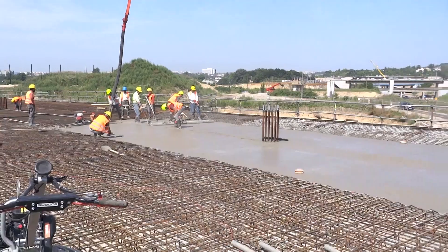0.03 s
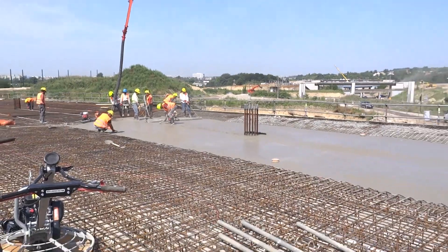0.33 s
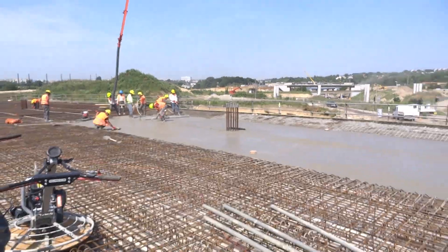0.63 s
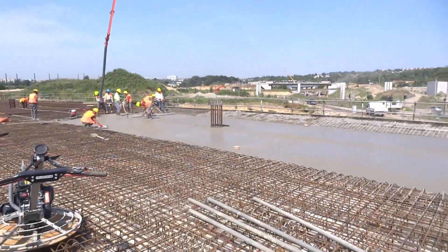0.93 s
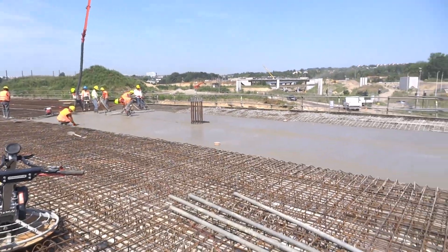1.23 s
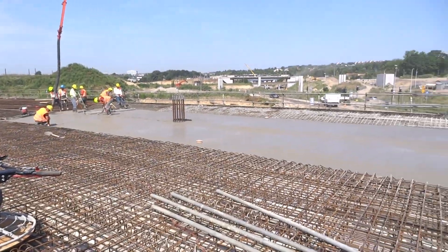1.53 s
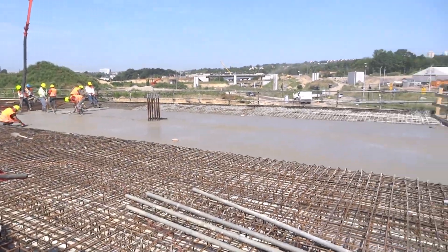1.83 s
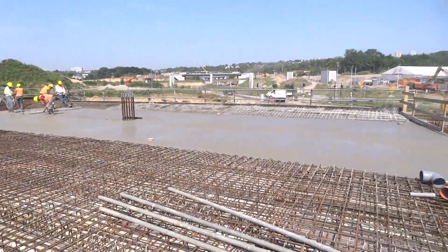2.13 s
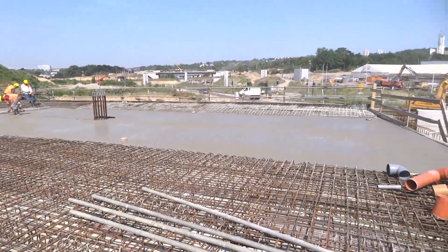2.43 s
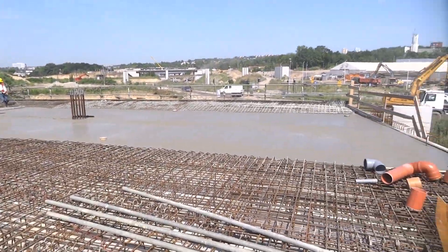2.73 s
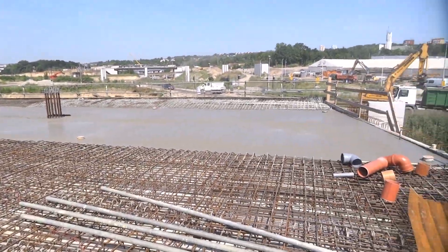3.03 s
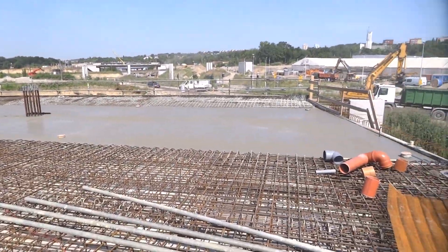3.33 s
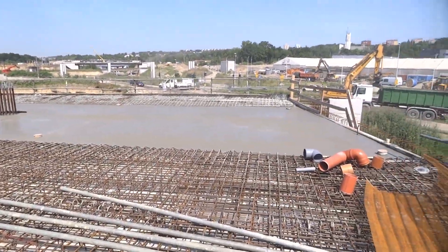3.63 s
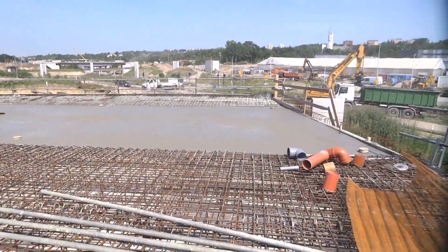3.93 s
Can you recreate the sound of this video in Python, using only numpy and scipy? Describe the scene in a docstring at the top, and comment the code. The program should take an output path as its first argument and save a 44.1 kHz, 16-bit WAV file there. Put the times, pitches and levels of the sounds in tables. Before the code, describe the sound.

A concreting machine's engine drones steadily outdoors with a fast metallic clatter.

```python
"""An open bridge deck, near a concreting engine at governed speed, four firings to a cycle.
The exhaust drones, the casing rings and howls, and the mechanism clatters in time with the firings,
echoing off nearby steel. Machines hum further off. The stereo microphone fades in and turns away,
which changes the colour; two brief scuffs pass close by, and gain control holds the level."""
import sys
import numpy as np
from scipy import signal
from scipy.fft import rfft, irfft
from scipy.io import wavfile
from scipy.ndimage import uniform_filter1d, map_coordinates

SR = 44100
rng = np.random.default_rng(int(sys.argv[2]) if len(sys.argv) > 2 else 0)


def transcribe(signal):
    """Save signal, clipped to [-1, 1], as a 16-bit WAV file at the path in sys.argv[1]."""
    frames = np.atleast_2d(signal).T
    limited = np.clip(frames, -1, 1)
    pcm = np.round(limited * 32767).astype(np.int16)
    wavfile.write(sys.argv[1], SR, pcm)


N = 176400
TIME, FREQS = np.arange(N) / SR, np.arange(N // 2 + 1) * SR / N

# Distant machines. Each row: pitch in Hz, level in dB.
FAR_HUM = [(51.5, -45)]
# Rubs, three to a scuff. Each row: start and length in seconds, level in dB, centre in Hz,
# side minus mid in dB.
SCUFFS = [(0.234, 0.03, -12.5, 6740, -17), (0.263, 0.08, -10.5, 5100, -14), (0.34, 0.065, -22, 4500, -24),
          (3.523, 0.023, -14.5, 6800, -6), (3.55, 0.074, -14, 4000, -7), (3.619, 0.071, -19.5, 3980, -14)]
# Engine speed. Each row: time in seconds, cycles per second.
SPEED = [(0, 31.64), (.3, 31.63), (.5, 31.77), (.72, 31.72), (1.1, 31.35), (1.35, 31.6), (1.55, 31.73),
         (1.75, 31.94), (2.2, 31.53), (2.45, 31.47), (2.6, 31.61), (3.08, 31.79), (3.37, 31.47),
         (3.62, 31.7), (4, 31.57)]
# Exhaust lines. Each row: multiple of the cycle rate, level in dB.
EXHAUST_LINES = [(4, -30.5), (5, -33), (6, -38.5), (7, -74), (8, -29.5), (9, -31.5), (10, -32.5),
                 (11, -36.5), (12, -31), (13, -43.5), (14, -63), (15, -41.5), (16, -56), (17, -43.5),
                 (18, -40.5), (19, -38), (21, -35), (22, -40), (23, -35), (24, -34.5), (25, -33), (26, -35),
                 (27, -32), (29, -37), (30, -30.5)]
# Level of exhaust and far hum. Each row: time in seconds, gain in dB.
BASS_GAIN = [(.1, -.5), (.23, -1), (.3, -3.5), (.5, 0), (1.6, -2), (2.2, -1), (2.67, 2.7), (3.1, -1),
             (3.48, -1), (3.57, -8.5), (3.7, 1.5), (3.8, -4.5), (4, 0)]
# Three casing tones. Each row: time in seconds, level in dB.
LOW_TONE_DB = [(.1, -25.5), (0.699, -22.5), (1.2, -22), (1.8, -21.5), (2.1, -26), (2.6, -27), (3, -28),
               (3.5, -35), (4, -50)]
MID_TONE_DB = [(.1, -27), (.3, -28), (.5, -20.5), (1, -20), (1.55, -23.5), (1.75, -28), (2.3, -25),
               (2.62, -23), (2.8, -13), (3.15, -28.5), (3.5, -24.5), (4, -27)]
HIGH_TONE_DB = [(0.098, -32), (1.5, -27.5), (2.2, -27), (2.6, -17.5), (3.1, -20), (3.3, -29), (3.48, -38),
                (3.57, -35), (3.699, -23.5), (4, -22)]
# Beamed whines. Each row: multiple of the cycle rate (rounded in use), level in dB,
# time on microphone and half length of the pass in seconds.
WHINES = [(41, -29.5, 0.22, .15), (53, -27, 1.24, 0.54), (54, -23, 2.23, 0.56), (56, -23.5, 2.8, 1.13),
          (57, -26, 3.4, 0.2), (60, -25, 3.8, 0.69), (61, -28.5, 0.17, 0.17), (65.44, -28, .6, 1.4),
          (67.06, -29, .6, 1.6), (69.8, -23, 5.4, 0.72), (77.5, -27, 1.3, 0.62), (85, -24, 0.091, 0.13),
          (88.8, -28, 0.42, 0.67), (90.6, -26, 0.15, 0.31), (92.9, -31.5, 0.83, 1.4)]
# Beamed casing resonances. Each row: centre and width in Hz, level in dB,
# time on microphone and half length of the pass in seconds.
CASING_MODES = [(1310, 14, -38, 2.16, 0.084), (1701, 44, -23.5, 1.67, 0.71), (1800, 28, -37, 2.1, 0.47),
                (1884, 23, -22, 4.1, 0.45), (1880, 45, -26, 2.1, 0.26), (2110, 23, -26.5, 1.3, 1),
                (2090, 150, -28, 2.05, 0.19), (2257, 27, -27.5, 2.7, 1), (2426, 24, -24, 1.5, 1),
                (2844, 73, -20.5, .17, .2), (2932, 20, -28, 1.6, 0.41), (3507, 28, -26.5, 0.57, .42),
                (3636, 14, -28, 0.95, 0.37), (4020, 26, -31.5, 1.3, 0.85), (4130, 22, -31, 2.2, 0.43),
                (4520, 22, -30.5, 1.1, 1), (5320, 90, -42, 0.78, 0.99), (6050, 15, -29, 1.22, 0.66),
                (7840, 89, -41, 1.7, 0.55), (9580, 93, -35, 0.43, 0.96), (11250, 150, -33, 0.81, 0.59),
                (11800, 82, -46, .8, .5), (12500, 150, -43, 3, 0.33)]
# Casing howl, louder off axis. Each row: time in seconds, centre in Hz, level in dB.
HOWL = [(1.6, 965, -36), (2.3, 985, -27), (2.7, 1017, -30.5), (3.08, 1037, -19.5), (3.4, 994, -19),
        (3.6, 1014, -23.5), (3.9, 1033, -22), (4, 1015, -18)]
# Knocks of one cycle. Each row: lag as a share of a firing period, level in dB.
CYLINDERS = [(0.0077, -3.5), (0.037, -5.5), (.02, -5.5), (0.058, -3)]
# Clatter colour. Each row: frequency in Hz, gain in dB facing the engine, gain in dB turned away.
CLATTER_COLOUR = [(30, -25, -20), (91, -11.5, -14), (146, -10, -6), (313, -3, 1), (500, -7, -2.5),
                  (700, 0.5, -0.5), (900, 0, 1.5), (1060, 0, 2), (1113, -10, 2), (1240, -5.5, -3),
                  (1340, -0.5, -4), (1550, -4, -2.5), (1590, -1, 6), (1670, 1.5, 4), (1830, -5, 5.5),
                  (1970, -0.5, 0.5), (2190, -3, -3), (2205, 2.5, 5), (2654, 1.5, 2.5), (2760, -2, -5),
                  (2880, 4, -2), (2960, -5, -8), (3170, 3, -2.5), (3350, -7, -5), (3600, -5.5, -5.5),
                  (3930, -4.5, -8), (4390, -6, -12), (4560, -11.5, -15.5), (4800, -13, -9),
                  (5400, -10, -8.5), (5800, -8.5, -10.5), (6230, -12.5, -17.5), (6930, -14.5, -16),
                  (6900, -14.5, -13.5), (7640, -14.5, -19), (8500, -16.5, -20), (8850, -12, -16.5),
                  (10100, -13.5, -18.5), (10700, -16.5, -23), (11300, -18.5, -21.5), (12700, -18, -21.5),
                  (13500, -30, -32), (15100, -51, -46)]
# Treble of the clatter. Each row: time in seconds, gain in dB.
TREBLE_GAIN = [(.1, 1), (1.2, -2.5), (1.7, -4.5), (2.2, -3), (2.65, -2), (2.9, 1), (3.4, -5), (3.7, -2),
               (4, -1)]
# Level of clatter, resonances, howl and whines. Each row: time in seconds, gain in dB.
CLATTER_GAIN = [(.1, -0.5), (.23, 1), (.29, 0), (.38, 1.5), (.5, 1.5), (1, 3), (1.6, 0), (2.1, 1),
                (2.45, 0.5), (2.65, 3.5), (3.2, -0.5), (3.5, -1.5), (3.55, -5.5), (3.63, -3.5), (3.73, -3),
                (3.8, -1.5), (4, -1)]
# Microphone turning away. Each row: time in seconds, share of the turn from 0 to 1.
MIC_TURN = [(0, 0.2), (1.2, 0.03), (1.9, 0.35), (2.3, 0.62), (2.6, 0.58), (3.2, 0.82), (4, 1)]
# Stereo width. Each row: frequency in Hz, side minus mid in dB.
STEREO_WIDTH = [(60, -57), (300, -46), (520, -23.5), (800, -27), (1150, -16), (1450, -22), (1900, -18.5),
                (2400, -25), (3700, -19), (5300, -17), (8000, -78), (13000, -76)]
# Lean to the left. Each row: time in seconds, left minus right in dB before weighting.
PAN_DB = [(0, -0.1), (1, 0), (2.2, 2), (4, 3.5)]
# Weighting of that lean. Each row: frequency in Hz, gain in dB.
PAN_WEIGHT = [(150, -23), (350, -4), (500, 3), (750, -3), (1100, 0.5), (1400, 0), (1800, -0.5), (2550, -3),
              (3500, 2.5), (4500, 1.5), (6000, -2), (8000, -17)]


def undb(db):
    return 10 ** (np.asarray(db) / 20)


def curve(rows):
    """A control joined by straight lines."""
    return np.interp(TIME, *np.array(rows).T)


def unit(x):
    return x / np.sqrt(np.mean(x ** 2))


def walk(rate_hz):
    """Smooth chance with spread 1."""
    return unit(irfft(rfft(rng.standard_normal(N)) * np.exp(-(FREQS / rate_hz) ** 2), N))


def colour(x, hz, db):
    """Filter by a spectrum of (Hz, dB) points."""
    return irfft(rfft(x) * undb(np.interp(np.log(FREQS + 1e-3), np.log(hz), db)), N)


def even(x, width_hz=140):
    """Even out the broad colour of a sound and leave its lines."""
    spectrum = rfft(x)
    power = uniform_filter1d(np.abs(spectrum) ** 2, int(width_hz * N / SR))
    return unit(irfft(spectrum / np.sqrt(power), N))


def ring(x, hz, width_hz, order=1):
    """A resonance with gain 1 at its centre."""
    f = FREQS + 1e-3
    return irfft(rfft(x) / (1 + 1j * (f * f - hz * hz) / (f * width_hz)) ** order, N)


def beam(facing_s, half_s, depth_db=14):
    """Gain in dB of a beamed sound as the microphone sweeps through it."""
    return depth_db * (np.exp(-((TIME - facing_s) / half_s) ** 2 / 2) - 1)


def far_hum(waver=.4):
    """The low wavering tone of machines further off."""
    return sum(np.sqrt(2) * undb(db + 2 * walk(3)) * np.sin(2 * np.pi * hz * TIME + waver * walk(3.7))
               for hz, db in FAR_HUM)


def scuffs(grain_db=2.2, top_hz=9260):
    """Short grainy rubs close to the microphone, a little different at each port."""
    grit = rng.standard_normal((2, N)) * undb(grain_db * walk(350))
    out = 0
    for start, length, db, hz, side_db in SCUFFS:
        progress = np.clip((TIME - start) / length, 0, 1)
        shape = np.sqrt(np.abs(np.sin(np.pi * progress)))
        mid, side = unit(ring(grit, hz, 2 * hz, order=2))
        out += undb(db) * shape * (mid + undb(side_db) * side * np.array([[1], [-1]]))
    return signal.sosfilt(signal.butter(5, top_hz, fs=SR, output="sos"), out)


def steel_echoes(x, count=8, lag_s=.0035, drift_s_per_s=.00009, echo_db=-13.5, above_hz=4500):
    """Nearby steel reflects the treble; the short lags drift as the microphone moves."""
    echoes = 0
    for lag, drift, sign in rng.uniform(-1, 1, (count, 3)):
        sent_s = TIME - lag_s * (.55 + .45 * lag) - drift_s_per_s * drift * TIME
        echoes += np.sign(sign) * map_coordinates(x, [sent_s * SR], order=3, mode="mirror")
    return signal.sosfilt(signal.butter(3, above_hz, "high", fs=SR, output="sos"), undb(echo_db) * echoes)


def exhaust(cycle, rough=.22, wander_db=2.5):
    """Multiples of the firing rate pulse together; uneven cylinders fill the lines between."""
    out = 0
    for multiple, db in EXHAUST_LINES:
        phase = 2 * np.pi * rng.random() * (multiple % len(CYLINDERS) > 0)
        line = np.sin(2 * np.pi * multiple * cycle + phase + rough * walk(11.5))
        out += np.sqrt(2) * undb(db + wander_db * walk(7.1)) * line
    return out


def casing_whines(cycle, rough=.42):
    """Narrow casing modes lock to multiples of the cycle rate, each beamed its own way."""
    out = 0
    for multiple, db, facing_s, half_s in WHINES:
        sway = 1 + rough * (walk(2.9) + 1j * walk(11))
        line = (sway * np.exp(2j * np.pi * (round(multiple) * cycle + rng.random()))).real
        out += np.sqrt(2) * undb(db + beam(facing_s, half_s) - .5) * line
    return out


def casing_tone(cycle, levels, multiple, rough=.16, lag_cycles=.0443):
    """A casing resonance driven on one multiple of the cycle rate, a little behind the firing."""
    sway = 1 + rough * (walk(20) + 1j * walk(29))
    line = (sway * np.exp(2j * np.pi * multiple * (cycle - lag_cycles))).real
    return np.sqrt(2) * undb(curve(levels)) * line


def casing_howl(drive, width_hz=35):
    """The knocks excite a casing resonance whose centre wavers."""
    rows = np.array(HOWL)
    spin = np.exp(2j * np.pi * np.cumsum(curve(rows[:, :2])) / SR)
    pole = np.exp(-np.pi * width_hz / SR)
    howl = (spin * signal.lfilter([1 - pole], [1, -pole], drive / spin)).real
    return undb(curve(rows[:, [0, 2]])) * unit(howl)


def casing_ring(drive, wander_db=.9):
    """The knocks ring the casing; each resonance swells as the microphone crosses its beam."""
    out = 0
    for hz, width_hz, db, facing_s, half_s in CASING_MODES:
        level = undb(db + beam(facing_s, half_s) + wander_db * walk(1.6) - 1.5)
        out += level * unit(ring(drive, hz, width_hz))
    return out


def rattle(position, size):
    """A random rattle with an even spectrum, read round and round."""
    pattern = unit(irfft(np.exp(2j * np.pi * rng.random(size))))
    return map_coordinates(pattern, [position % 1 * len(pattern)], mode="grid-wrap")


def knocks(cycle, turn, rise_s=.0011, decay_s=.0036, scatter_db=.5, alike=.55, repeat_hz=(1150, 6850)):
    """A burst of rattle at each firing, partly alike for all cylinders."""
    lag, db = np.array(CYLINDERS).T
    count = len(CYLINDERS)
    firing = (cycle * count).astype(int)
    firing_phase = (cycle * count - lag[firing % count]) % 1
    age_s = firing_phase / count / curve(SPEED)
    strength = undb(db[firing % count] + scatter_db * rng.standard_normal(1024)[firing])
    bursts = strength * (1 - np.exp(-age_s / rise_s)) * np.exp(-age_s / decay_s)
    # the midrange repeats every cycle; bass and top are mostly fresh noise
    repeating = np.sqrt(alike) * rattle(firing_phase, 176) + np.sqrt(1 - alike) * rattle(cycle, 701)
    low_hz, high_hz = repeat_hz
    share = .91 / (1 + (FREQS / high_hz) ** 2) * FREQS ** 4 / (FREQS ** 4 + low_hz ** 4)
    fresh = rfft(rng.standard_normal(N))
    rattles = irfft(rfft(even(repeating)) * np.sqrt(share) + fresh * np.sqrt(1 - share), N)
    # off axis, reflections fill the gaps between knocks and blur the lines
    floor, blur = .14 + .05 * turn, .2 * turn
    blurred = np.sqrt(1 - blur) * rattles + np.sqrt(blur) * rng.standard_normal(N)
    return even((floor + bursts) * blurred)


def clatter(drive, turn, trim_db=-15.5, treble_hz=6740):
    """The knocks heard directly and off the steel, changing colour as the microphone turns."""
    hz, facing_db, away_db = np.array(CLATTER_COLOUR).T
    heard = drive + steel_echoes(drive)
    facing, away = colour(heard, hz, facing_db), colour(heard, hz, away_db)
    out = undb(trim_db) * (facing * (1 - turn) + away * turn) / np.std(facing)
    treble = signal.sosfiltfilt(signal.butter(2, treble_hz, "high", fs=SR, output="sos"), out)
    return out + treble * (undb(curve(TREBLE_GAIN)) - 1)


def scene(diffuse_db=-13, diffuse_lag_s=.048):
    """Engine, far hum and scuffs as they reach the microphone's two ports."""
    cycle = np.cumsum(curve(SPEED) * (1 + .001237 * walk(12.6))) / SR
    turn = curve(MIC_TURN)
    tones = (casing_tone(cycle, LOW_TONE_DB, 20) + casing_tone(cycle, MID_TONE_DB, 28)
             + casing_tone(cycle, HIGH_TONE_DB, 32, rough=.18))
    whines = casing_whines(cycle)
    drive = knocks(cycle, turn)
    mechanism = whines + clatter(drive, turn) + casing_howl(drive) + casing_ring(drive)
    dip_db = -7.5 * np.exp(-((TIME - 3.305) / .022) ** 2)  # the level dips briefly once
    upper = (tones + mechanism * undb(curve(CLATTER_GAIN))) * undb(dip_db)
    lower = (exhaust(cycle) + far_hum()) * undb(curve(BASS_GAIN) + dip_db / 2)
    mid = upper + lower
    # the ports differ in phase, in the far reflections they catch, and in level towards the engine
    diffuse = undb(diffuse_db) * np.interp(TIME - diffuse_lag_s, TIME, mid)
    spread = colour(signal.hilbert(mid).imag + diffuse, *np.array(STEREO_WIDTH).T)
    lean = colour(upper, *np.array(PAN_WEIGHT).T) * np.tanh(curve(PAN_DB) * np.log(10) / 40)
    return mid + (spread + lean) * np.array([[1], [-1]]) + scuffs()


def record(dry, knee_db=-11, window_s=.027, fade_start_s=.081, fade_s=.033, top_hz=14900):
    """Gain control holds the level, peaks are rounded, the sound fades in and the top is cut."""
    power = uniform_filter1d(np.mean(dry ** 2, axis=0), int(window_s * SR))
    held = dry / (1 + (power / undb(knee_db) ** 2) ** 4) ** (1 / 8)
    rounded = 1.1 * np.tanh(held / 1.05)
    fade = np.clip((TIME - fade_start_s) / fade_s, 0, 1) ** 2
    return signal.sosfilt(signal.ellip(8, .2, 80, top_hz, fs=SR, output="sos"), rounded * fade)


dry = scene()
out = record(dry)
transcribe(out)
```